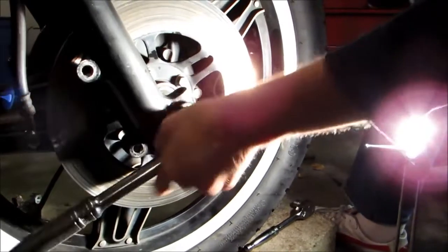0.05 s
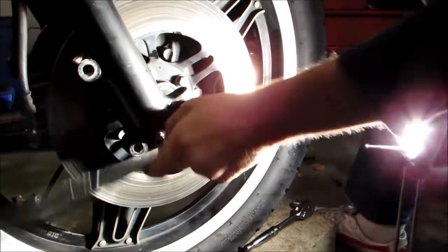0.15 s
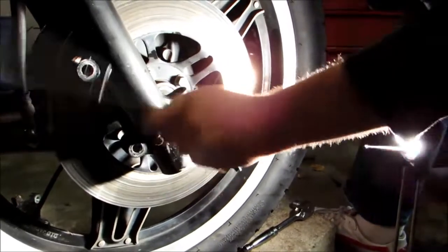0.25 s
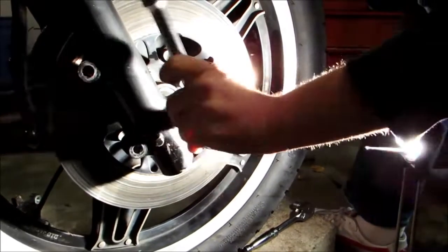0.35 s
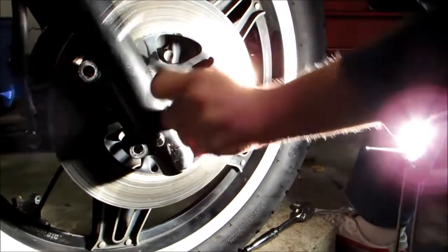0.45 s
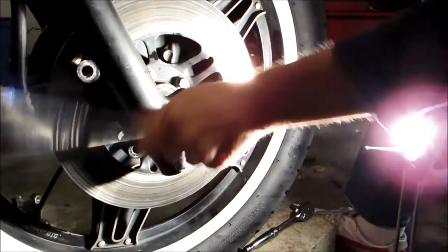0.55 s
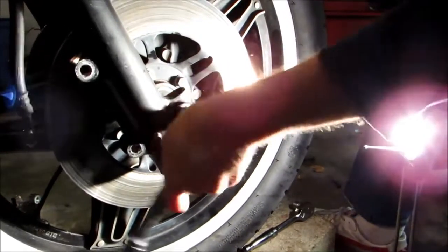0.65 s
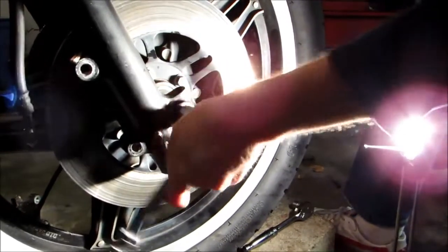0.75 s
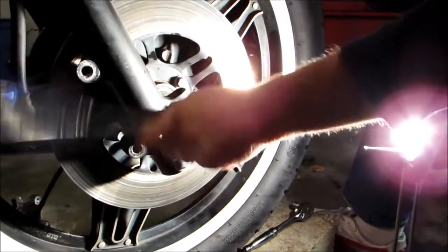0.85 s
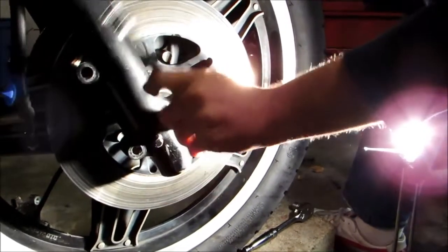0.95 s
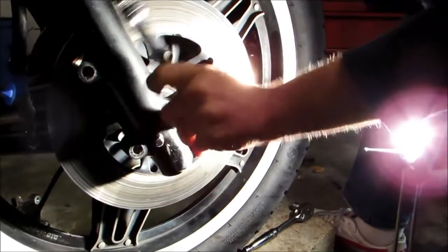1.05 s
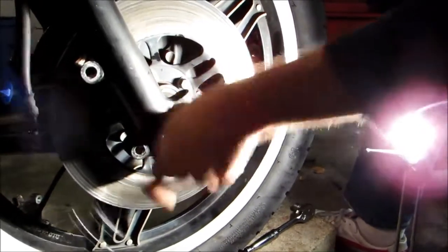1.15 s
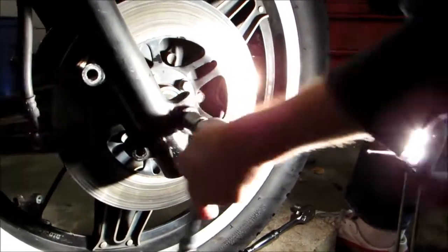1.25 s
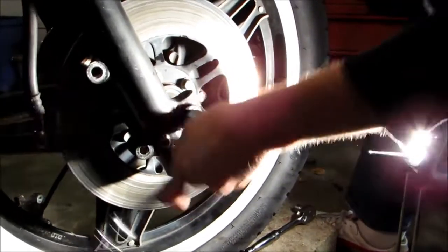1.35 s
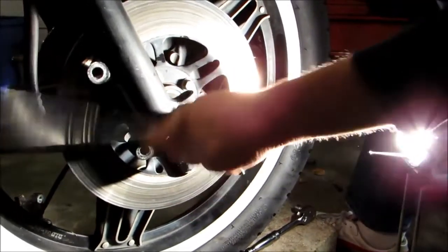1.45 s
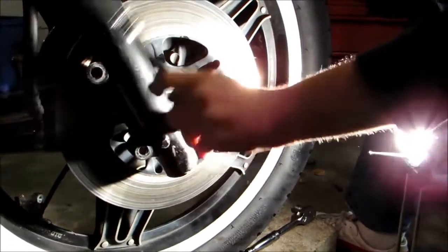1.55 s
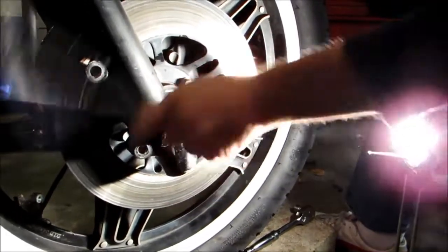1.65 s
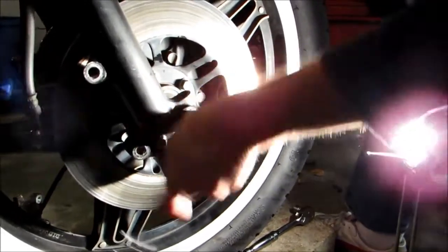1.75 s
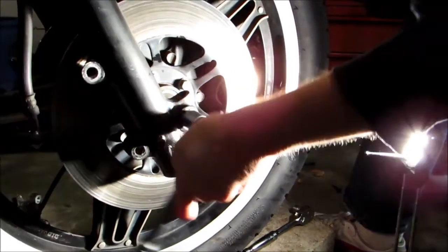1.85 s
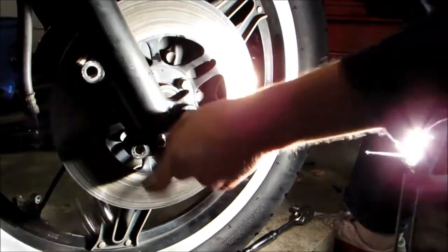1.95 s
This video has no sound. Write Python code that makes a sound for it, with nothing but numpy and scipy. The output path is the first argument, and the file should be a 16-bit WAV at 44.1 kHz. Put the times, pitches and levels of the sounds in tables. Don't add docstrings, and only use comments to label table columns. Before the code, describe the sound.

A socket ratchet clicks in three quick back-swings, with metallic clacks between strokes, in a garage.

```python
import sys
import numpy as np
from scipy import signal
from scipy.fft import rfft, irfft, next_fast_len
from scipy.io import wavfile
from scipy.ndimage import uniform_filter1d, map_coordinates

SR = 44100
rng = np.random.default_rng(int(sys.argv[2]) if len(sys.argv) > 2 else 0)


def nominal_scale(level):
    x = np.asarray(level, float) / 20
    return 10 ** x


def file_out(sig):
    cols = np.atleast_2d(sig).T
    lim = np.clip(cols, -1, 1)
    pcm = np.round(lim * 32767).astype(np.int16)
    wavfile.write(sys.argv[1], SR, pcm)


N = 85995


def unit(x):
    return x / np.sqrt(np.mean(x ** 2) + 1e-20)


def along(points, hz):
    f, v = np.transpose(points)
    return np.interp(np.log(hz + 1), np.log(f + 1), v)


def filtered(x, response):
    m = next_fast_len(x.shape[-1] + 4096)
    spectrum = rfft(x, m) * response(np.fft.rfftfreq(m, 1 / SR))
    return irfft(spectrum, m)[..., :x.shape[-1]]


def add(track, s, sound):
    part = track[:, round(s * SR):][:, :sound.shape[1]]
    part += sound[:, :part.shape[1]]


def hum():
    # (f/Hz, level/dB per Hz)
    spectrum = [(20, -4), (70, -2), (300, -2.5), (900, -7), (2200, -15), (5000, -19.5), (13500, -27.5),
                (15000, -58)]
    # (f/Hz, left-right likeness)
    likeness = [(60, -0.72), (130, -0.42), (290, -1.53), (640, -0.29), (1400, 0.22), (3100, 0.19),
                (15000, 0.013)]
    # (f/Hz, left over right/dB)
    balance = [(40, -1.5), (110, 4), (250, 1.5), (2000, 0)]

    def mid_side(hz):
        angle = np.arccos(np.clip(along(likeness, hz), -1, 1)) / 2
        return nominal_scale(along(spectrum, hz)) * [np.cos(angle), np.sin(angle)]

    mid, side = filtered(rng.standard_normal((2, N)), mid_side)
    pair = np.array([mid + side, mid - side])
    pair = filtered(pair, lambda hz: nominal_scale(along(balance, hz) * [[.5], [-.5]]))
    return nominal_scale(-49 + 2.5) * unit(pair)


def shudder():
    # (t/s, level/dB)
    effort = [
        (0.15, -54),
        (0.3, -50),
        (0.55, -52.5),
        (0.7, -54.5),
        (0.9, -49.5),
        (1.15, -55.5),
        (1.28, -56),
        (1.5, -51),
        (1.749, -53.5),
        (1.85, -54),
    ]
    # (f/Hz, level/dB per Hz)
    spectrum = [(60, -23), (140, -1.5), (290, 4), (600, -9.5), (1200, -18), (2500, -61)]
    s, level_db = np.transpose(effort)
    lumps = map_coordinates(rng.standard_normal(64), [np.arange(N) * 25 / SR])
    a, b = unit(filtered(rng.standard_normal((2, N)), lambda hz: nominal_scale(along(spectrum, hz))))
    level = nominal_scale(np.interp(np.arange(N) / SR, s, level_db) + 2.9 * lumps)
    return level * np.array([a + 0.29 * b, a - 0.39 * b])


def chatter(shape):
    burst = shape * rng.standard_normal(len(shape))
    for _ in range(4):
        z = rfft(burst)
        even = irfft(z / uniform_filter1d(np.abs(z), size=9), len(shape))
        burst = shape * even / np.sqrt(np.abs(uniform_filter1d(even ** 2, size=40)) + 1e-12)
    return burst


def contact(groups, hold_s):
    # (f/Hz, share)
    apart = [(1000, 0.11), (4000, 0.36), (12000, 0.85)]
    rise_s, sag_db, die_t60_s, roughness_db = 0.00059, 4, 0.019, 1.5
    scatter_db, detune = 2.5, 0.008
    wall_blur = 2.43
    t, f = np.arange(2048) / SR, np.fft.rfftfreq(4096, 1 / SR)
    sag = -sag_db * np.minimum(t / hold_s, 1)
    decay = -60 * np.maximum(t - hold_s, 0) / die_t60_s
    shape = np.minimum(t / rise_s, 1) * nominal_scale(sag + decay)
    shape = shape * nominal_scale(roughness_db * np.repeat(rng.standard_normal(len(t) // 32), 32))
    same, other = rfft(chatter(shape), 2 * len(t)), rfft(chatter(shape), 2 * len(t))
    out = 0
    for level_db, modes in groups:
        luck = rng.standard_normal((len(modes), 2))

        def resonance(widening):
            total = 0
            for k, ((hz, width, db), (a, b)) in enumerate(zip(modes, luck)):
                damping = 1j * f * width * widening
                mode = damping / ((hz * (1 + detune * b)) ** 2 - f * f + damping)
                total = total + (-1) ** k * nominal_scale(db + scatter_db * a) * mode
            return total

        near = resonance(1)
        spectra = [same * near, other * near * along(apart, f), same * resonance(wall_blur)]
        mid, side, far = irfft(spectra)
        size = np.linalg.norm(mid)
        sound = np.array([(mid + side) / size, (mid - side) / size, far / np.linalg.norm(far)])
        out = out + nominal_scale(level_db) * sound
    return out


def slack():
    # (t/s, level/dB, low modes/dB, upper modes/dB, loaded mode f/Hz)
    clacks = [
        (0.1976, -40.5, 7.5, -30, 2270),
        (0.2455, -44, 6, -5, 1700),
        (0.5082, -34.5, 2.5, -2.5, 2610),
        (0.7841, -42.5, -29, -8, 1490),
        (1.1182, -30, -9, -7, 2450),
        (1.3551, -56.5, -4, 7, 2970),
        (1.403, -34, -29, 4, 3100),
        (1.6955, -29.5, -8.5, 1.5, 2050),
        (1.7084, -37, -2, -12, 2400),
        (1.909, -69, -15, 3, 2200),
    ]
    # (f/Hz, width/Hz, level/dB)
    socket = [(620, 940, -7.5), (1237, 190, 6), (1700, 1640, -4), (2300, 590, -1), (2900, 650, 0),
              (5160, 1700, 4), (6280, 840, 8.5), (8550, 1300, -6.5), (13000, 6000, -12)]
    soft_hz, energy_db = 3760, 21.5
    dull, bright = np.zeros((2, 3, N))
    for s, db, low_db, upper_db, loaded_hz in clacks:
        groups = [(low_db, socket[:2]), (0, socket[2:5]), (1.5, [(loaded_hz, 380, 0)])]
        add(dull, s, nominal_scale(db + energy_db) * contact(groups, hold_s=0.0054))
        add(bright, s, nominal_scale(db + energy_db) * contact([(upper_db, socket[5:])], hold_s=0.0017))
    return bright + filtered(dull, lambda f: 1 / (1 + 1j * f / soft_hz - (f / soft_hz) ** 2) ** 2)


def stand():
    onsets = [.201, .206, .508, .805, .882, 1.117, 1.3345, 1.35, 1.70]
    # (level/dB, f/Hz, t60/s, left share relative to right)
    bumps = [
        [(-31, 248, 0.022, 1.1)],
        [(-14, 596, 0.011, .88)],
        [(-28.5, 310, 0.045, 0.6)],
        [(-27, 167, 0.059, 1.2), (-24.5, 250, .023, 1.34)],
        [(-23, 475, 0.06, 1.33), (-23.5, 640, 0.042, 0.52)],
        [(-37, 160, 0.14, 0.65)],
        [(-8, 311.6, 0.13, -0.32), (-11, 429, 0.049, -0.27), (-13, 514, 0.066, -.55), (-26.5, 87, 0.088, -1.84),
         (-25, 827, .038, 0.46), (-34.5, 1700, 0.021, .77)],
        [(-10, 360, 0.027, -0.85), (-19.5, 478, 0.033, 0.57)],
        [(-48, 250, 0.26, 1)],
    ]
    out, t = np.zeros((2, N)), np.arange(SR // 4) / SR
    for s, shakes in zip(onsets, bumps):
        for db, hz, t60, left in shakes:
            rise = (1 - np.exp(-t / 0.0013)) ** 2
            shake = nominal_scale(db - 60 * t / t60) * rise * np.sin(2 * np.pi * hz * t)
            add(out, s, shake * np.array([[left], [1]]))
    return out


def garage(x):
    # (f/Hz, t60/s)
    decay = [(300, 0.3), (1300, 0.33), (3500, 0.41), (9000, 0.35), (15000, 0.26)]
    # (f/Hz, level/dB)
    tone = [(300, 5.5), (1500, -3.5), (5000, -8), (14000, -3.5), (14600, -10), (15000, -45)]
    level_db, delay_s, likeness = -6, 0.004, 0.6
    out, size = np.zeros((2, N)), SR // 20
    angle = np.arccos(likeness) / 2
    for start in range(0, N, size):
        hz, t, z = signal.stft(rng.standard_normal((2, SR // 2)), SR, nperseg=256)
        tail_db = along(tone, hz)[:, None] - 60 * t / along(decay, hz)[:, None]
        a, b = signal.istft(z * nominal_scale(tail_db), SR, nperseg=256)[1]
        mid, side = np.cos(angle) * a, np.sin(angle) * b
        tail = np.array([mid + side, mid - side]) / np.linalg.norm(a)
        add(out, start / SR + delay_s, signal.fftconvolve(x[None, start:start + size], tail, axes=1))
    return nominal_scale(level_db) * out


def pawl():
    # (t/s, head level/dB, handle over head/dB, pawl over head/dB, loaded handle f/Hz)
    stroke_1 = [
        (0.2483, -9, -9, -7.5, 2900),
        (0.2712, -12.5, -1.5, -27, 2900),
        (0.2914, -13, -5, -1.5, 2900),
        (0.3117, -13, -13.5, -5.5, 2920),
        (0.3326, -12.5, -8, -13.5, 2700),
        (0.361, -11, -8, -11.5, 3100),
        (0.3974, -10.5, -14.5, -19, 3150),
    ]
    stroke_2 = [
        (0.8493, -13.5, -5.5, -9, 2700),
        (0.8728, -12.5, -9, -8, 2700),
        (0.895, -13, -12, -3.5, 2700),
        (0.9145, -16, -11.5, -7, 3530),
        (0.9334, -16, -21, -10, 3500),
        (0.9548, -15, -10, -8, 2860),
        (0.9782, -13, -15, -15, 3100),
        (1.0038, -13.5, -9.5, -13, 3120),
        (1.034, -13.5, -9.5, -1.5, 3180),
    ]
    stroke_3 = [(1.3911, -10.5, -11, -14.5, 1710), (1.4143, -13, -10, -18, 2630),
                (1.4364, -15, -14.5, -14, 3400), (1.4582, -12.5, -17.5, -14, 3060),
                (1.477, -12.5, -14.5, -10, 3300), (1.496, -13, -8.5, -4.5, 3460),
                (1.516, -13, -12.5, -18, 3600), (1.5361, -12, -15, -10, 3430),
                (1.556, -14.5, -10.5, -2, 2710), (1.5786, -10, -14.5, -30, 2500),
                (1.6078, -11.5, -7.5, -9.5, 2900)]
    # (pawl f/Hz, cheek f/Hz, cheek level/dB, crown f/Hz, crown level/dB)
    seating = [(6080, 5070, -4, 9000, -2), (5800, 5200, -21, 8700, -9), (6040, 5400, -10, 9040, 6.5),
               (5900, 5000, -0.5, 9500, -14), (5930, 5400, -5, 8500, -5), (5900, 4800, -5, 8800, 1),
               (5700, 4700, -15, 8560, -3.5), (6070, 5050, 2.5, 9100, 4), (5780, 5060, 6, 8100, -3),
               (6060, 5140, 1, 9230, 4), (5870, 5100, -5, 4600, 3), (5900, 2900, 6, 9800, 5),
               (5860, 3500, -12, 8900, -2), (6100, 5100, -3, 9560, 2), (6140, 5500, -9.5, 9400, 2),
               (6050, 7500, -4, 8850, 4), (6150, 4500, -12, 9070, 3.5), (6400, 4100, -4, 9200, -1),
               (6450, 4600, -2, 9100, -3), (6100, 4800, -1, 10000, 4), (6100, 5650, 2, 9200, 0),
               (5900, 5150, -2, 9940, 1), (5800, 5000, -5, 8700, 0), (6150, 5200, -2, 8200, -8),
               (6010, 5500, 3, 8700, -3), (6270, 5800, -5, 9000, -0.5), (5980, 7000, -18, 8400, 1)]
    # (f/Hz, level re loaded mode/dB, chatter/ms)
    grip = [(1700, -8.5, 2.6), (1670, -8, 3.3), (1610, -23, 2.4), (3350, -1, 3.1), (3100, -33, 1.8),
            (2700, -31, 1.9), (2600, 1, 2.8), (3100, -14, 1.15), (3500, -10, 2.4), (1610, -2.5, 1.7),
            (2500, -5, 1.7), (2620, 8, 3.6), (1700, -17, 1.9), (2280, -14, 1.9), (2700, -2.5, 4.2),
            (1690, -8.5, 3.2), (2820, 3.5, 1.5), (1700, -20, 6), (2500, -10, 1.5), (1630, -4, 2.1),
            (2860, -2, 2.9), (1600, -6.5, 2.6), (1650, -5, 4), (1710, -2, 2.5), (1620, -6, 3.3),
            (1600, -32, 4), (3620, -11, 1.8)]
    # (f/Hz, width/Hz, level/dB)
    head = [(4490, 420, -0.5), (7710, 610, 3.5), (8490, 490, -2), (10180, 830, 3), (10610, 960, 2),
            (12400, 750, 4.5), (12900, 1200, -1)]
    handle = [(1166, 213, -10), (1573, 80, -5.5), (2570, 520, -5.5), (2857, 432, 0.5), (3380, 800, -4.5)]
    # (ratio to seated pitch, width/Hz, level/dB)
    pawl_modes = [(0.998, 248, 5), (1.048, 300, 0)]
    # (f/Hz, level/dB, t60/s)
    ringing = [(2155, -35.5, 0.75), (2263, -41, 0.72), (2910, -22, 0.088), (3120, -47, 0.3),
               (6000, -47, 0.088), (6370, -54, .12)]
    head_db, handle_base_db, pawl_base_db, seated_db = 11.5, 21.5, 20, 7.5
    loaded_width = 190
    out, t = np.zeros((3, N)), np.arange(SR // 3) / SR
    for snap, seat, held in zip([*stroke_1, *stroke_2, *stroke_3], seating, grip):
        s, db, handle_db, pawl_db, loaded_hz = snap
        pawl_hz, cheek_hz, cheek_db, crown_hz, crown_db = seat
        grip_hz, grip_db, chatter_ms = held
        handle_level = handle_base_db + handle_db
        loaded_level = handle_level - 2
        groups = [
            (head_db, head),
            (handle_level - 6, handle),
            (loaded_level, [(loaded_hz, loaded_width, 0)]),
            (seated_db + cheek_db, [(cheek_hz, 280, 0)]),
            (seated_db + crown_db, [(crown_hz, 380, 0)]),
            (loaded_level + grip_db, [(grip_hz, loaded_width, 0)]),
            (pawl_base_db + pawl_db, [(pawl_hz * ratio, width, g) for ratio, width, g in pawl_modes]),
            (head_db - 10, [(7150, 12000, 0)]),
        ]
        add(out, s, nominal_scale(db) * contact(groups, chatter_ms / 1000))
        ring = np.zeros(len(t))
        for hz, g, t60 in ringing:
            a, b = rng.standard_normal(2)
            decay = nominal_scale(g + 1.3 * a - 60 * t / t60)
            ring += decay * np.sin(2 * np.pi * hz * (1 + 0.0055 * b) * t)
        add(out, s, nominal_scale(db - 2.5) * np.array([ring, ring, ring]))
    return out


def scene():
    left, right, far = pawl() + slack()
    tool = np.array([left, right]) * nominal_scale(1.7 * np.array([[.5], [-.5]]))
    return hum() + shudder() + tool + stand() + garage(far)


def top_cut(x):
    return signal.sosfilt(signal.butter(12, 16640, fs=SR, output="sos"), x)


def record(dry):
    # (f/Hz, width/Hz, depth)
    notches = [(3870, 59, 1), (4070, 670, 0.23), (7870, 170, 0.38)]
    # (f/Hz, level/dB)
    roll = [(13800, 0.75), (14700, -6), (15300, -22), (16500, -32)]

    def response(hz):
        gain = nominal_scale(along(roll, hz)) * (hz < 16640)
        for centre, width, depth in notches:
            gain = gain * (1 - np.clip(depth, 0, 1) * np.exp(-((hz - centre) / width) ** 2))
        return gain

    return top_cut(filtered(dry, response))


dry = scene()
out = record(dry)
file_out(out)
```